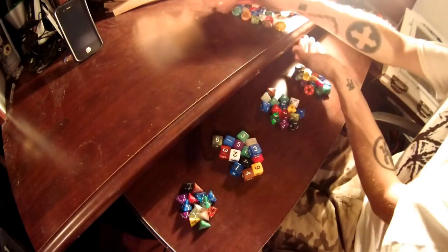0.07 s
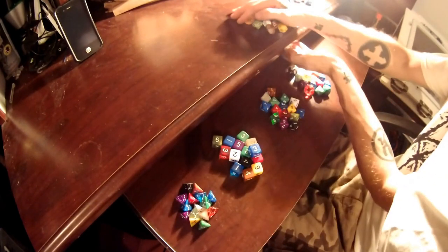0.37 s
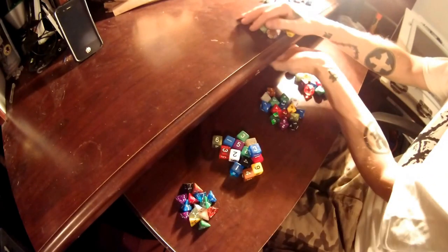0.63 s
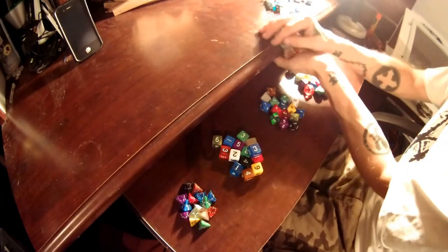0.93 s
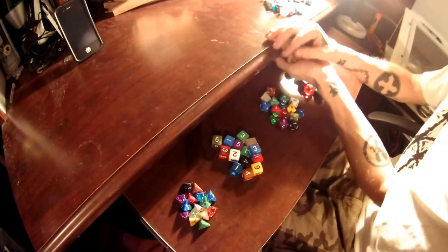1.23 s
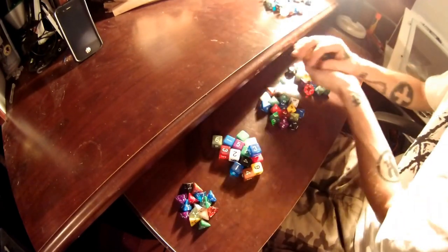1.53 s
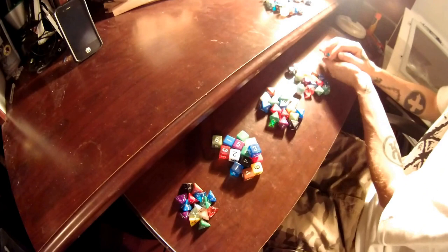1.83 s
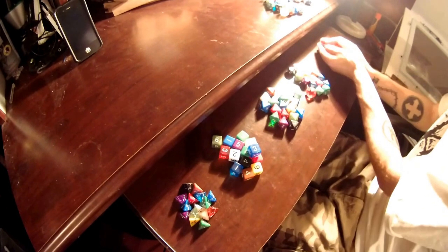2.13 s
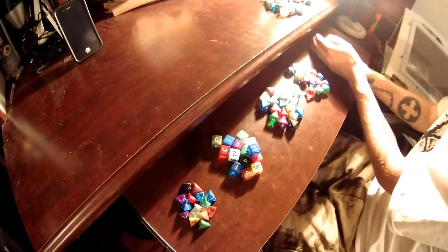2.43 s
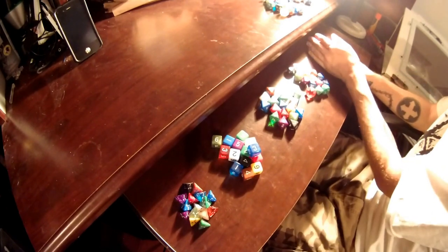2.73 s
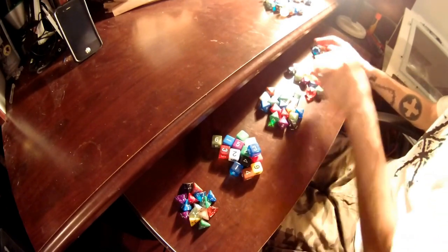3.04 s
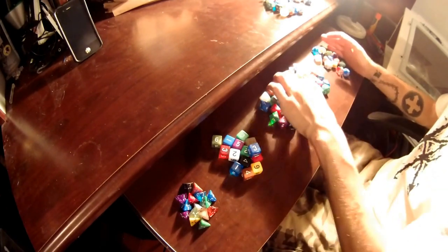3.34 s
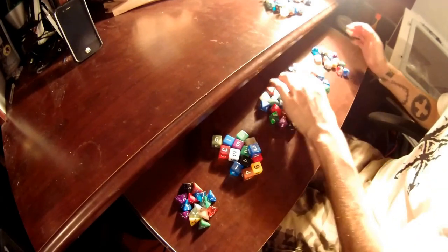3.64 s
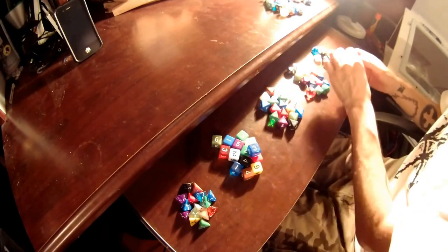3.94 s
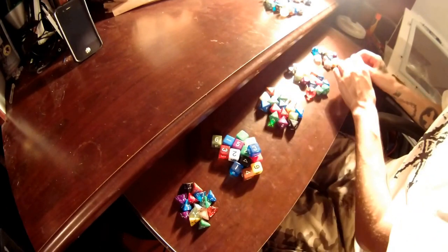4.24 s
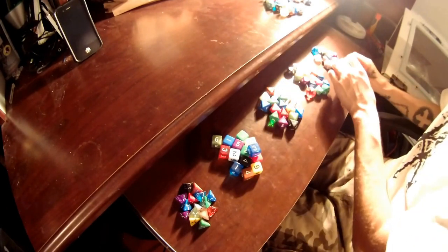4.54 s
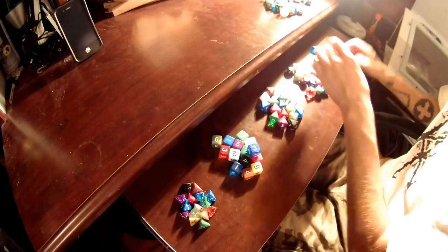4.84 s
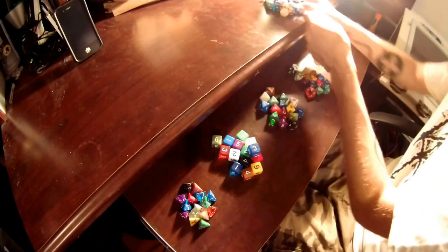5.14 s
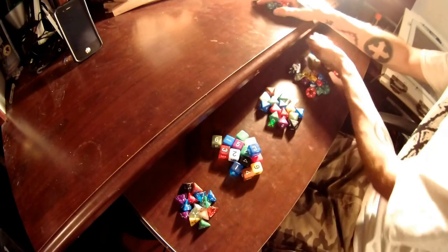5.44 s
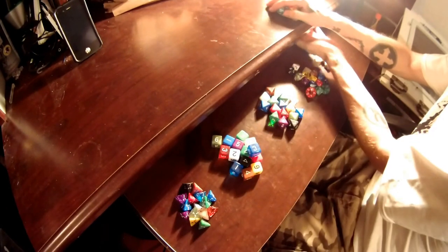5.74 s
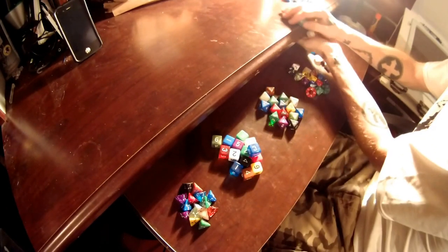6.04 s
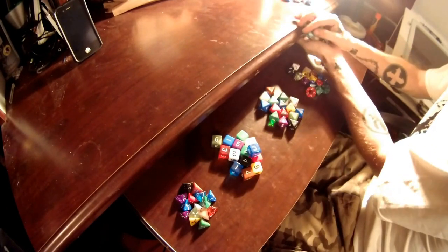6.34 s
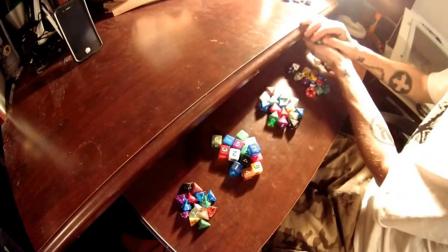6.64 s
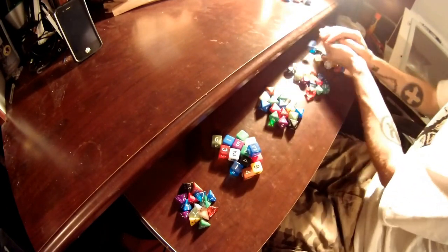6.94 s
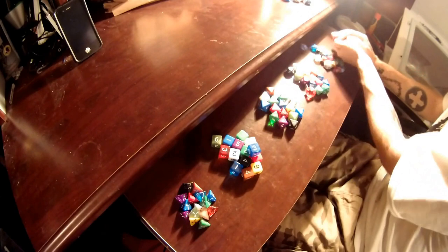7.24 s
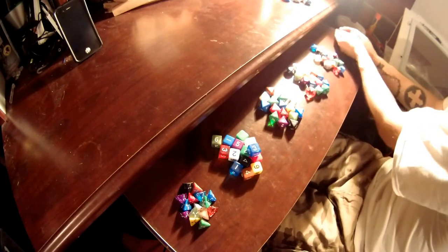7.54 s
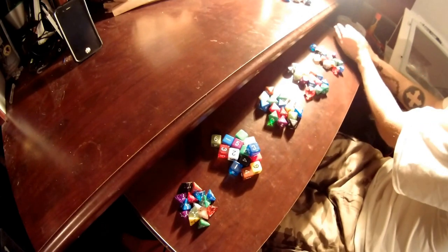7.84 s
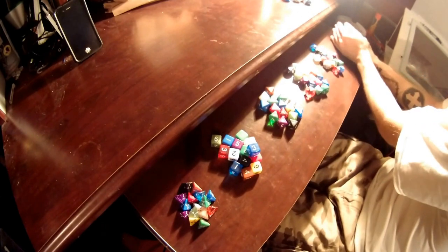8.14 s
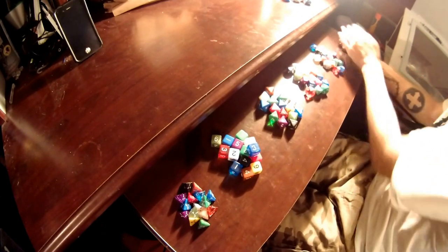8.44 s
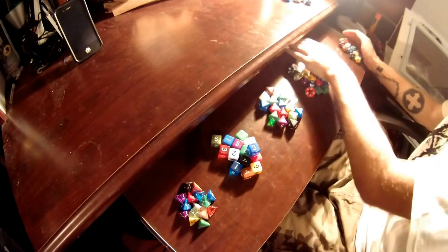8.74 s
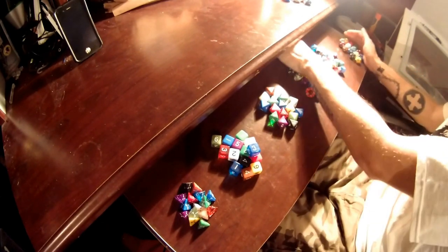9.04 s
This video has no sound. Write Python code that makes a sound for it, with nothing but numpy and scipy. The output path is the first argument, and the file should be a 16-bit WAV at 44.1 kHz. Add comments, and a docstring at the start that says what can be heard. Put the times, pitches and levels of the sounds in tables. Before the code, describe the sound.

Close, irregular clicks and clacks of plastic dice being swept together, handled and spilled onto wood in a small room.

```python
"""Dice on a wooden desk

Close to the microphone, in a small room, two hands sweep plastic dice over a desk, gather them at
its edge and spill them onto a pull-out shelf. Each contact is a sharp tick and a short ring of the
wood; in between, dice slide, jostle and rub in the palm. The walls answer over a low rumble and a
faint mains hum, and loud clacks duck the recorder's gain."""
import sys
import numpy as np
from scipy import signal
from scipy.fft import rfft, irfft, next_fast_len
from scipy.io import wavfile
from scipy.ndimage import uniform_filter1d, map_coordinates

SR = 44100
rng = np.random.default_rng(int(sys.argv[2]) if len(sys.argv) > 2 else 0)


def unload_audio(sound):
    """Save the sound as a 16-bit wav file, at the path given as the first command line argument."""
    columns = np.transpose(np.atleast_2d(sound))
    # keep every value between -1 and 1, then stretch to whole-number steps
    steps = np.round(np.clip(columns, -1, 1) * 32767)
    wavfile.write(sys.argv[1], SR, steps.astype(np.int16))


N = 400428
TIME = np.arange(N) / SR

# distinct dice contacts:
# (time [s], level of the first 8 ms [dB], die pitch [Hz], snap above it [dB], ring against tick [dB])
CLICKS = [(0.1311,-43,4130,-1.5,11), (.158,-55.5,3900,1,8.5), (0.202,-52,4000,-3.5,0),
          (.227,-59,4600,1,-2.5), (.273,-53.5,3800,-7,-11), (.306,-56.5,3770,-1.5,-9),
          (0.3232,-45,4260,-16,26), (0.487,-49.5,4300,0.5,7), (0.5302,-54,4800,-5,-9.5),
          (.596,-61.5,4500,-4,3), (.688,-54,4020,-8,0), (0.7295,-39.5,3150,-16.5,24),
          (0.783,-54,4500,6.5,1), (0.8345,-39.5,4350,-3,18), (0.8602,-41.5,4620,20,-6),
          (0.8735,-39.5,3050,-14,1), (0.9277,-39.5,4260,5,0), (1.0053,-45,2670,-36,-10),
          (1.03,-49,4350,11,14), (1.061,-49,3000,-5,12.5), (1.136,-54,4200,5.5,6), (1.3039,-48,4280,4.5,1),
          (1.3569,-43,3070,-19,4), (1.3645,-41,3160,-8.5,13), (1.451,-43.5,4840,17,-4.5),
          (1.481,-49.5,4450,12.5,-1.5), (1.5664,-24,4280,-6,-8), (1.7061,-30,3800,-12.5,-1),
          (1.7643,-34,4100,0,-3.5), (1.8403,-35.5,2410,-3.5,7.5), (1.932,-44,5000,-14,-17),
          (2.211,-39,4500,0.5,-7.5), (2.216,-33.5,4460,0,-17.5), (2.2688,-40,4500,-6.5,-5),
          (2.279,-45,3600,-2,-12), (2.301,-40.5,4430,0,-1.5), (2.333,-49,3300,3.5,-3),
          (2.367,-40,2650,-2.5,-3.5), (2.4096,-39.5,4100,-10,-13), (2.415,-34.5,4150,-0.5,0.5),
          (2.4325,-34.5,4350,2.5,0.5), (2.4467,-39.5,4300,0.5,7), (2.4651,-37.5,4150,3,-1),
          (2.5082,-45,4400,16,-14), (2.5658,-44,4300,-6.5,-15), (2.5734,-46.5,4300,-8.5,2),
          (2.6408,-42.5,4300,-16,-5), (2.6968,-43,4300,-2.5,-6), (2.533,-38,3970,-7.5,2),
          (2.6494,-41,4640,1,5.5), (2.6723,-42,4180,-2.5,-1), (2.9387,-44.5,3300,-3,5.5),
          (3.025,-59.5,3760,-15.5,-5.5), (3.051,-40,3205,-7.5,-4), (3.0592,-40,4000,-11.5,-2.5),
          (3.101,-41.5,4450,-17,-6), (3.1363,-45.5,4840,-7,-4), (3.1613,-36.5,3300,-5.5,-24.5),
          (3.202,-47.5,3000,-10,-3.5), (3.4366,-47,3400,-12,-1.5), (3.5946,-43.5,1950,-7,1.5),
          (3.5934,-41,3890,-29,19), (4.4222,-47,3040,-19,-2.5), (4.4235,-48,1630,-34,-2.5),
          (4.5287,-55.5,4050,11,7), (4.647,-47,4130,-53,4), (4.745,-60,3500,-10,-6),
          (4.833,-58,3250,-9.5,-9), (5.328,-52,6640,-19,5), (5.3485,-54,4550,-13,17),
          (5.608,-51,3000,-18,25), (5.6427,-49.5,2650,-22,4), (5.957,-43,1960,-32,-7),
          (5.9698,-42,3180,-28,12.5), (5.9867,-42.5,2150,-30,-6), (6.0116,-41.5,3530,12,-8),
          (6.0314,-38.5,2850,-5,3), (6.0455,-44.5,4550,19,1.5), (6.119,-42.5,2100,-14,-1),
          (6.187,-47,4760,19,1.5), (6.218,-41.5,2480,-12,-5), (6.2293,-44.5,4800,10.5,9),
          (6.2421,-48,4500,7,0), (6.2519,-46,4300,1.5,-5.5), (6.5075,-42.5,2080,-25,-4),
          (6.6277,-44.5,4800,2.5,9), (6.6549,-48,5030,4,3), (6.76,-52,4600,-10.5,8.5),
          (6.851,-55,4800,-3,6), (6.9414,-25,3150,-3.5,-9), (7.0963,-27,5180,9,-7),
          (7.1663,-39.5,3790,0,-6), (7.206,-32,3950,-4,-2), (7.261,-35.5,3800,-12.5,-7),
          (7.3064,-44,3500,-20,-4), (7.3241,-39,4250,-22,-23), (7.3595,-43.5,4060,-27,1),
          (7.378,-49,3500,-40,4.5), (7.41,-38.5,4960,-7.5,-4.5), (7.5129,-44.5,3800,-31,7),
          (7.7115,-39,4320,-21,-9), (7.7416,-40.5,4300,-14,-7), (7.7615,-45.5,4400,-26,10),
          (7.7875,-41,4440,-23.5,-3), (7.7951,-35,2460,0,-22), (7.8016,-35.5,4240,-10.5,-15),
          (7.8193,-35.5,4240,-15,4), (7.8363,-38,4350,-15.5,-6), (7.8448,-43.5,4400,-7,-23),
          (7.8481,-38,4500,-14,-12), (7.8543,-33,4440,-22,-10), (7.9039,-44.5,2700,-5,0),
          (7.9151,-39,4630,-5,-6.5), (7.9266,-35.5,4750,-7.5,-0.5), (7.9524,-39,4400,-13.5,-12),
          (7.9787,-38.5,4300,-21.5,-2), (7.9878,-43,4400,-6,-14), (8.0192,-43.5,4700,-10,3),
          (8.0352,-41.5,4470,-13,8), (8.1525,-53.5,3500,-11,-12), (8.174,-47,4570,-23,-8),
          (8.2092,-48.5,4350,-21,13), (8.0721,-39,4250,-16,-2), (8.1108,-43,4320,-14,-2),
          (8.1469,-43,4730,-20,0), (8.19,-44.5,4370,-13.5,-6), (8.2668,-51.5,2850,-21,-9),
          (8.278,-50.5,2780,-20,-6), (8.3575,-56.5,3030,-21,-7), (8.4702,-56.5,4230,-8,-2),
          (8.502,-61.5,2660,-35,-5), (8.538,-64,3000,-13,2), (8.623,-65.5,1920,-29,-16)]
# dice tumbling in a heap: (start [s], end [s], relative level of a touch [dB], plastic snap [dB])
JOSTLES = [(0.141, 0.333, -62.5, -8), (0.807, 1.165, -56, 0.5), (1.215, 1.545, -65, -0.5),
           (1.779, 2.069, -48.5, -11), (2.218, 2.406, -53.5, -13), (2.4, 2.582, -44.5, -8),
           (2.579, 2.798, -47, -6), (3.053, 3.186, -48.5, -15), (4.516, 4.594, -64, -6),
           (4.63, 4.689, -54, -10.5), (5.435, 5.512, -57, -13), (5.95, 6.257, -57, -8),
           (6.427, 6.484, -68, -20), (6.503, 6.68, -57, 0), (7.31, 7.697, -58, -9),
           (7.759, 7.88, -45.5, -12), (7.88, 8.052, -47.5, -13), (8.036, 8.225, -73, -22)]
# dice pushed over the wood: (start [s], end [s], relative level [dB], cupped hand resonance [Hz])
PUSHES = [(0.172, 0.665, -62.5, 1320), (0.676, 1.143, -55.5, 1690), (1.512, 1.523, -62, 1740),
          (2.1, 2.187, -76, 2180), (2.463, 2.809, -55, 1340), (3.407, 3.441, -67.5, 2500),
          (4.517, 4.81, -62.5, 2380), (5.427, 5.829, -60.5, 1170), (5.824, 6.274, -57, 1120),
          (6.495, 6.601, -51, 1690), (7.756, 7.88, -67, 2240)]
# dice squeezed in the palm: (start [s], end [s], relative level [dB])
SQUEEZES = [(.49, .54, -60), (.83, .98, -53.5), (.99, 1.14, -69), (1.45, 1.55, -59.5), (2.08, 2.14, -49.5),
            (2.4, 2.72, -63), (6.01, 6.095, -52), (6.16, 6.26, -49), (6.51, 6.68, -57.5), (6.7, 6.8, -57),
            (7.63, 7.68, -51.5), (7.76, 7.87, -54.5)]
# heavy landings: (time [s], gain [dB])
LANDINGS = [(.128, -44.5), (0.319, -55.5), (1.564, -38), (1.705, -42.5), (1.843, -50), (2.211, -55),
            (3.595, -56.5), (4.421, -55.5), (5.969, -50), (6.221, -48.5), (6.512, -55), (6.939, -42),
            (7.098, -52)]
# motions that shake the furniture: (start [s], end [s], level [dB])
PRESSED_ROLLS = [(1.72, 2.04, -62.5), (5.96, 6.282, -63.5), (6.508, 6.612, -61.5)]  # dice rolled under the weight of a hand
NUDGES = [(0, .3, -59), (1.99, 2.19, -52), (3.92, 4.1, -59)]  # an arm rocks the desk
# the furniture booms near 125 Hz, first the desk under an arm, last the shelf under rolling dice:
# (start [s], end [s], level [dB])
LOW_BOOMS = [(.08, .42, -47.5), (.55, .8, -51), (.82, 1.2, -48.5), (1.28, 1.48, -47), (1.69, 2.05, -41.5)]
# hands on the desk top, otherwise on the shelf: (start [s], end [s])
DESK_SPANS = [(0, 1.55), (5.2, 6.85)]

# modes of the struck wood: (frequency [Hz], width [Hz], level [dB])
DESK_MODES = [(426, 37, 1), (714, 110, -5), (967, 37, -0.5), (1220, 60, 1.5), (1648, 130, 3.5),
              (2020, 49, -3.5), (3000, 55, -13.5), (3410, 250, -25.5), (5065, 69, -9.5)]
SHELF_MODES = [(668, 57, -3), (1124, 57, -12.5), (1388, 16, -1), (1620, 100, -9), (2110, 55, -7.5),
               (2493, 81, -3), (3300, 49, -11.5), (3930, 97, -8), (4550, 130, -12)]
# low bending modes: (frequency [Hz], t60 [s], level [dB])
DESK_BENDING = [(165, 0.042, -3.5), (299.5, 0.068, -8), (389, 0.051, -3.5), (428, 0.059, 1),
                (547, 0.052, -5), (660, 0.057, -10)]
SHELF_BENDING = [(123.4, 0.14, -7), (366, 0.17, -9.5), (417, 0.066, -10), (538, 0.06, -1.5),
                 (650, .045, -9.5)]
# a free drop adds a low push and a high crack: (frequency [Hz], gain per dB of drop [dB])
DROP_TILT = [(300, 1.76), (700, -0.1), (1500, -1), (9000, 0), (15000, 2.5)]
# the wooden knock lies below the treble: (frequency [Hz], gain per dB of knock [dB])
KNOCK_TILT = [(1250, 1.0), (2200, 0.038)]
# decay of the room: (frequency [Hz], t60 [s])
ROOM_DECAY = [(200, 0.33), (1000, 0.25), (3500, 0.23), (7000, 0.35), (14000, 0.098)]
# mains hum: (frequency [Hz], level [dB])
MAINS_HUM = [(118.4, -74.5), (236.9, -85.5)]

# spectra at the microphone: (frequency [Hz], relative level [dB])
TICK_SPECTRUM = [(80, -29), (270, -10), (430, -2), (650, 0.5), (1500, 3.5), (2300, 4.5), (4500, 8),
                 (5600, 4.5), (7200, 4), (10000, 0), (13000, -11.5), (16000, -21.5)]
SHELF_LOW_CUT = [(300, -12), (520, -9.5), (640, 2)]  # the small shelf radiates little bass
SLIDE_SPECTRUM = [(150, -19), (330, -19.5), (425, -5.5), (510, -11), (750, -4.5), (960, -4), (1550, -7),
                  (2000, -8), (2900, -16.5), (6000, -28), (16000, -39.5)]
RUB_SPECTRUM = [(1000, -28), (2600, 1), (3400, 7.5), (5500, 1.5), (9500, 2), (12500, -15.5), (16000, -26.5)]
SWAY_SPECTRUM = [(12, -11), (22, -9.5), (34, -3.5), (50, -12.5), (100, -37), (300, -78.5)]
BOOM_SPECTRUM = [(60, -23.5), (100, -7.5), (125, 14), (170, -20), (400, -47.5)]
AIR_SPECTRUM = [(20, -12.5), (60, -9), (90, 0.5), (150, 0.5), (300, -10.5), (500, -13), (1000, -18.5),
                (2500, -28.5), (6000, -32), (16000, -33.5)]
RUMBLE_SPECTRUM = [(15, -8), (35, -0.5), (60, -1.5), (100, -20), (300, -76)]
DRONE_SPECTRUM = [(25, -21), (60, 5), (85, 0), (120, -2), (180, -6), (350, -42.5)]
ROOM_SPECTRUM = [(200, 4.5), (700, 1.5), (2500, 1.5), (5000, -6.5), (6500, -7.5), (9000, -10),
                 (15000, -10.5)]

DIE_HZ, DIE_SPREAD_OCT = 3800, 0.37  # usual pitch of a die and its scatter over a set
PITCH_DB, PITCH_WIDTH_OCT, SNAP_RISE_OCT = 2.3, 0.74, 1  # a die's resonance and the slope above it
DIE_ON_DIE_DB, KNOCK_LOSS = -2, 0.94  # above this snap, die meets die: dB of knock lost per dB
DROP_DB, DROP_BODY, DROP_RING = -28.5, 0.69, 0.81  # a louder contact is a free drop: dB gained per dB
HARD_DB, HARD_HZ, HARD_WIDTH_OCT = -40.5, 1950, 0.86  # a louder contact drives this band of the wood
HARD_GROWTH, HARD_MAX_DB = 0.6, 4.5  # dB gained in that band per dB, and the limit
SPOT_DB, SPOT_DETUNE = 3, .012  # the wood's modes scatter from one struck spot to the next
DESK_PAN_DB, SHELF_PAN_DB = 0.14, -3  # left minus right at the microphone


def clicks(ripple):
    """Dice drop, bounce and knock together close to the microphone."""
    out = np.zeros((2, N + SR))
    for time, db, pitch_hz, snap_db, ring_db in CLICKS:
        drop_db = max(db - DROP_DB, 0)
        hard_db = np.clip(HARD_GROWTH * (db - HARD_DB), 0, HARD_MAX_DB)
        knock_db = knock(db, snap_db)
        click = contact(on_desk(time), knock_db, pitch_hz, snap_db, ring_db, ripple, drop_db, hard_db)
        add(out, time, amp(db) * click)
    return out[:, :N]


def contact(desk, knock_db, pitch_hz, snap_db, ring_db, ripple=1, drop_db=0, hard_db=0,
            ring_t60=0.055, colour_db=2.0, size=2048):
    """One tick and ring, at rms 1 over its first 8 ms; ripple is how unevenly the die radiates."""
    t = np.arange(size) / SR
    hz = np.fft.rfftfreq(size, 1 / SR)
    # scatter off nearby dice, stronger when a die lands in a heap
    chatter = .42 * ripple * amp(1.5 * max(ring_db, 0))
    tick = chatter * stereo_noise(side_db=-9, size=size) * amp(-60 * t / .005)
    tick[:, 0] = 1
    ring = stereo_noise(side_db=-9.5, size=size) * amp(-60 * t / ring_t60)
    blow = filtered(unit(tick) + amp(ring_db) * unit(ring), lambda f: wood(f, desk, ripple))
    # wood gives the body; the die rings at its pitch, and only a hard contact reaches above it
    tone_db = along(TICK_SPECTRUM, hz) + knock_db * along(KNOCK_TILT, hz)
    tone_db += (PITCH_DB + DROP_RING * drop_db) * bell(hz, pitch_hz, PITCH_WIDTH_OCT)
    tone_db += snap_db * np.clip(np.log2((hz + 1) / pitch_hz) / SNAP_RISE_OCT, 0, 1)
    tone_db += drop_db * along(DROP_TILT, hz)
    tone_db += hard_db * bell(hz, HARD_HZ, HARD_WIDTH_OCT)
    # each die has its own colour, a smooth random curve
    knots = rng.standard_normal(size // 64)
    tone_db += ripple * colour_db * map_coordinates(knots, [np.sqrt(hz / hz[-1]) * (len(knots) - 1)])
    click = signal.fftconvolve(blow, causal(tone_db)[None], axes=1)[:, :size]
    return click / np.sqrt(np.mean(click[:, t < .008] ** 2))


def knock(db, snap_db, body_db=0.5):
    """Wooden body of a contact in dB: more for a free drop, less when die meets die."""
    if db > DROP_DB:
        return body_db + DROP_BODY * (db - DROP_DB)
    return body_db - KNOCK_LOSS * max(snap_db - DIE_ON_DIE_DB, 0)


def wood(hz, desk, ripple):
    """Response of the desk top or the shelf; each struck spot weights the modes anew."""
    modes = DESK_MODES if desk else SHELF_MODES
    spot = ripple * clipped_normal((len(modes), 2))
    body = 1.1 - .55 * ripple  # flat bed of weak modes
    for (centre, width, db), (detune, lift) in zip(modes, spot):
        centre *= 1 + SPOT_DETUNE * detune
        resonance = 1j * hz * width / (centre ** 2 - hz ** 2 + 1j * hz * width)
        body += amp(db + SPOT_DB * lift) * resonance
    return body if desk else body * amp(along(SHELF_LOW_CUT, hz))


def jostle(trim_db=-2, spread_db=4, cushion_db=-1.5, count=10, touches=80, touches_per_s=140):
    """Many light, separate contacts as dice tumble in a heap and settle."""
    heap = np.zeros((2, N + SR))
    for start, end, db, snap_db in JOSTLES:
        pitches = DIE_HZ * 2 ** (DIE_SPREAD_OCT * rng.standard_normal(count))
        knock_db = knock(db, snap_db) + cushion_db
        dice = [contact(on_desk(start), knock_db, hz, snap_db, ring_db=-6) for hz in pitches]
        times = start + (np.arange(touches) + 2 * rng.random(touches)) / touches_per_s
        force = amp(db + trim_db + spread_db * clipped_normal(touches)) * rng.choice([-1, 1], touches)
        force *= stroke(times, start, end, attack_s=0.007, release_s=0.028, fade_db_per_s=12.5)
        for k, time in enumerate(times):
            add(heap, time, force[k] * dice[k % count])
    return heap[:, :N]


def slide(trim_db=-1, hollow_db=7, hollow_oct=0.21):
    """Faces of dice catch on the grain of the wood; the hollow of the hand above them resonates."""
    catches = unit(grains(per_s=2200, spread_db=4))
    friction = coloured(catches + 1.2 * stereo_noise(side_db=-4), SLIDE_SPECTRUM)
    out = np.zeros((2, N + SR))
    for start, end, db, hollow_hz in PUSHES:
        span = slice(round(start * SR), round(start * SR) + SR)
        cupped = filtered(friction[:, span], lambda hz: amp(hollow_db * bell(hz, hollow_hz, hollow_oct)))
        push = stroke(TIME[span], start, end, attack_s=0.016, release_s=0.049, fade_db_per_s=1)
        add(out, start, amp(db + trim_db) * push * unit(cupped))
    return out[:, :N]


def rub(trim_db=-1, count=6, scatter_t60=0.024):
    """Plastic creaks on plastic in the palm: tiny bright slips, each with its own die's scatter."""
    t = np.arange(256) / SR
    slips = np.zeros((2, N))
    for _ in range(count):
        scatter = stereo_noise(side_db=-5.5, size=len(t)) * amp(-60 * t / scatter_t60)
        catches = grains(per_s=75, spread_db=7)
        slips += signal.oaconvolve(catches[None], scatter, axes=1)[:, :N]
    grip = strokes(SQUEEZES, attack_s=0.0097, release_s=0.12, fade_db_per_s=3.5)
    creak = coloured(unit(slips) + 0.28 * stereo_noise(side_db=-1), RUB_SPECTRUM)
    return amp(trim_db) * grip * creak


def thumps():
    """Heavy landings bend the board, which rings briefly."""
    out = np.zeros((1, N + SR))
    for time, db in LANDINGS:
        add(out, time, amp(db) * bending(time)[None])
    return out[:, :N]


def rolls():
    """Corners of pressed dice bump over the board and keep its low modes ringing."""
    out = np.zeros(N)
    for start, end, db in PRESSED_ROLLS:
        corners = grains(per_s=180, spread_db=1.5)
        ringing = unit(signal.oaconvolve(corners, bending(start))[:N])
        press = stroke(TIME, start, end, attack_s=.015, release_s=0.13, fade_db_per_s=5.5)
        out += amp(db) * press * ringing
    return out


def bending(time, attack_s=0.0021):
    """The low ring of the board that is under the hands at this time."""
    t = np.arange(SR // 4) / SR
    modes = DESK_BENDING if on_desk(time) else SHELF_BENDING
    ring = sum(amp(db + rng.normal(0, 2) - 60 * t / t60) * np.sin(2 * np.pi * hz * t)
               for hz, t60, db in modes)
    return ring * (1 - np.exp(-t / attack_s))


def room(x, build_s=0.00045, count=4):
    """Near walls return diffuse tails, duller than the dice; the pattern shifts as the hands move."""
    out = np.zeros((2, N))
    for k in range(count):
        hz, t, noise = signal.stft(stereo_noise(side_db=-5.5, size=SR // 2), SR, nperseg=256)
        decay = amp(along(ROOM_SPECTRUM, hz)[:, None] - 60 * t / along(ROOM_DECAY, hz)[:, None])
        tail = signal.istft(noise * decay * (1 - np.exp(-t / build_s)), SR, nperseg=256)[1]
        active = (TIME * 10).astype(int) % count == k  # the tails take turns every 0.1 s
        out += signal.oaconvolve((x * active)[None], tail / np.linalg.norm(tail[0]), axes=1)[:, :N]
    return out


def background(air_db=-72, rumble_db=-68, boom_floor_db=-73, drone_db=-68):
    """Room tone of air, rumble, drone and mains hum, with the sway and low boom of the furniture."""
    air = amp(air_db) * coloured(stereo_noise(side_db=-4), AIR_SPECTRUM)
    rumble = amp(rumble_db) * coloured(stereo_noise(side_db=-17), RUMBLE_SPECTRUM)
    nudges = strokes(NUDGES, attack_s=0.01, release_s=0.15)
    sway = nudges * coloured(stereo_noise(side_db=-3), SWAY_SPECTRUM)
    swells = strokes(LOW_BOOMS, attack_s=0.026, release_s=0.39, fade_db_per_s=8.5)
    boom = np.hypot(amp(boom_floor_db), swells) * coloured(rng.standard_normal(N), BOOM_SPECTRUM)
    hum = sum(amp(db) * np.sqrt(2) * np.sin(2 * np.pi * hz * TIME) for hz, db in MAINS_HUM)
    drone = amp(drone_db) * coloured(rng.standard_normal(N), DRONE_SPECTRUM)
    opposite_phase = np.array([[1], [-.7]])  # left and right of the microphone
    return air + rumble + sway + hum + (boom + drone) * opposite_phase


def gain_control(x, threshold_db=-32, slope=0.76, release_db_per_s=16, window=88):
    """Loud clacks turn the recorder's gain down at once; it creeps back up."""
    power = uniform_filter1d(np.mean(x ** 2, axis=0), window)
    level_db = 10 * np.log10(np.abs(power) + 1e-12)
    cut_db = slope * np.maximum(level_db - threshold_db, 0)
    recovery_db = release_db_per_s * TIME
    held_db = np.maximum.accumulate(cut_db + recovery_db) - recovery_db
    smooth_db = signal.lfilter(np.ones(2 * window) / (2 * window), 1, held_db)
    return x * amp(-smooth_db)


def on_desk(t):
    """1 while the hands are on the desk top, 0 on the shelf."""
    return sum((t >= start) * (t < end) for start, end in DESK_SPANS)


def stroke(t, start, end, attack_s, release_s, fade_db_per_s):
    """Gain of one motion: it rises, holds while slowly fading, and dies away."""
    rise = np.clip((t - start) / attack_s, 0, 1)
    fade_db = fade_db_per_s * np.clip(t - start, 0, end - start)
    release_db = 60 * np.maximum(t - end, 0) / release_s
    return rise * amp(-fade_db - release_db)


def strokes(rows, attack_s, release_s, fade_db_per_s=0):
    """Gain of all motions of one kind."""
    return sum(amp(db) * stroke(TIME, start, end, attack_s, release_s, fade_db_per_s)
               for start, end, db in rows)


def grains(per_s, spread_db):
    """Impulses of random time, size and sign."""
    hits = rng.random(N) < per_s / SR
    return hits * amp(spread_db * clipped_normal(N)) * rng.choice([-1, 1], N)


def stereo_noise(side_db, size=N):
    """White mid/side noise as left and right, at rms 1."""
    mid, side = rng.standard_normal((2, size))
    return unit(np.array([mid + amp(side_db) * side, mid - amp(side_db) * side]))


def clipped_normal(shape):
    """Normal draws held within two standard deviations."""
    return np.clip(rng.standard_normal(shape), -2, 2)


def filtered(x, response):
    """x through a response given as a function of frequency."""
    n = x.shape[-1]
    padded = next_fast_len(n + SR // 10)
    return irfft(rfft(x, padded) * response(np.fft.rfftfreq(padded, 1 / SR)), padded)[..., :n]


def coloured(x, spectrum):
    """x shaped by a spectrum, at rms 1."""
    return unit(filtered(x, lambda hz: amp(along(spectrum, hz))))


def causal(db):
    """The minimum-phase impulse response of this spectrum."""
    cepstrum = irfft(db * np.log(10) / 20)
    half = len(cepstrum) // 2
    return irfft(np.exp(rfft(np.r_[cepstrum[0], 2 * cepstrum[1:half]], 2 * half)))


def along(points, hz):
    """Interpolate (frequency, value) points on a log axis."""
    freqs, values = np.transpose(points)
    return np.interp(np.log(hz + 1), np.log(freqs + 1), values)


def bell(hz, centre_hz, width_oct):
    """A bump of height 1 on an octave axis."""
    return np.exp(-(np.log2((hz + 1) / centre_hz) / width_oct) ** 2)


def amp(db):
    """Decibels to gain."""
    return 10 ** (np.asarray(db) / 20)


def unit(x):
    """Scaled to rms 1."""
    return x / np.sqrt(np.mean(x ** 2) + 1e-20)


def add(out, time, sound):
    """Mix a sound in at a time in seconds."""
    out[:, round(time * SR):][:, :sound.shape[1]] += sound


def scene(room_db=-11.5):
    """Close microphone in a small room: desk top straight ahead, shelf a little to the right."""
    handling = thumps() + rolls() + jostle() + slide() + rub()
    direct = handling + clicks(ripple=1)
    # the walls are reached from all sides of a die, so its ripple evens out
    to_walls = handling + clicks(ripple=0)
    pan_db = uniform_filter1d(np.where(on_desk(TIME), DESK_PAN_DB, SHELF_PAN_DB), size=SR // 4)
    pan = amp(np.outer([.5, -.5], pan_db))
    return direct * pan + amp(room_db) * room(to_walls.mean(axis=0)) + background()


def record(dry, band_limit_hz=16400):
    """The recorder rides its gain and keeps nothing above its band limit."""
    return filtered(gain_control(dry), lambda hz: hz < band_limit_hz)


dry = scene()
out = record(dry)
unload_audio(out)
```